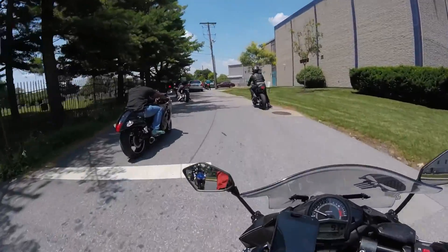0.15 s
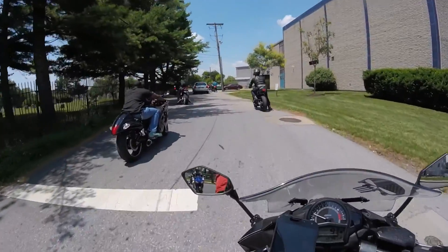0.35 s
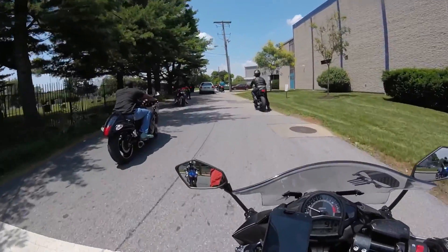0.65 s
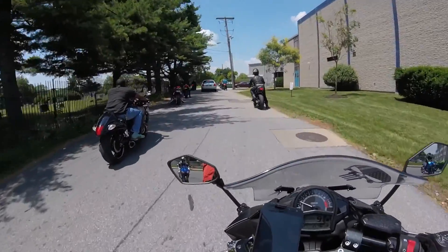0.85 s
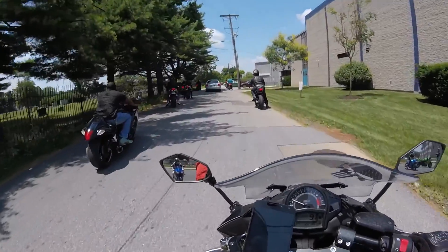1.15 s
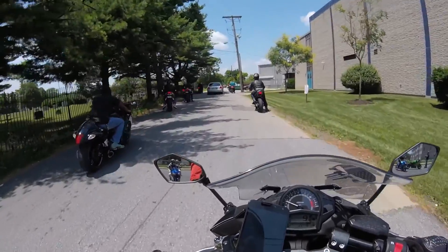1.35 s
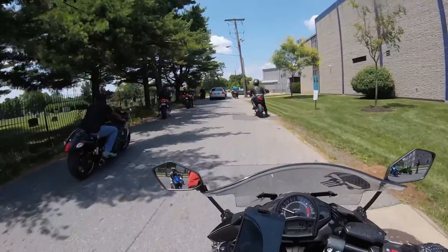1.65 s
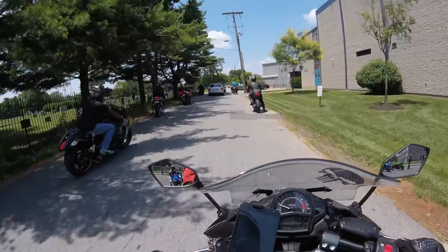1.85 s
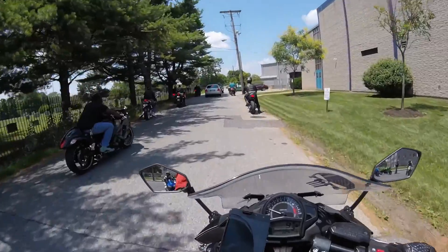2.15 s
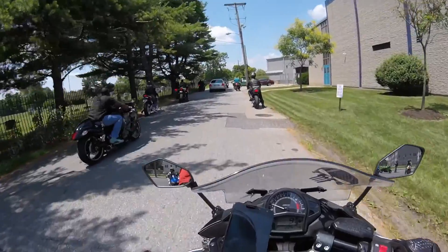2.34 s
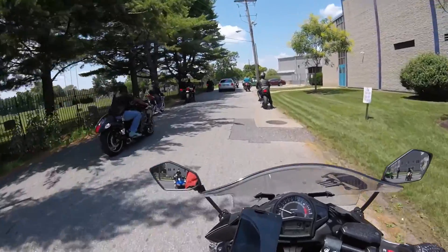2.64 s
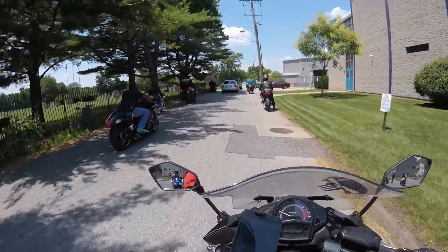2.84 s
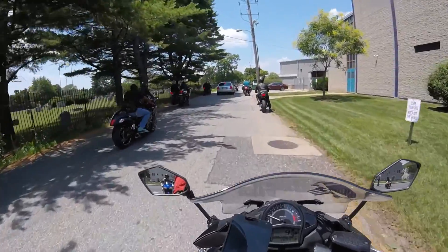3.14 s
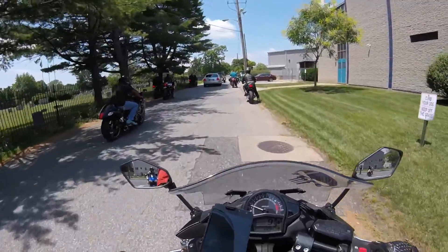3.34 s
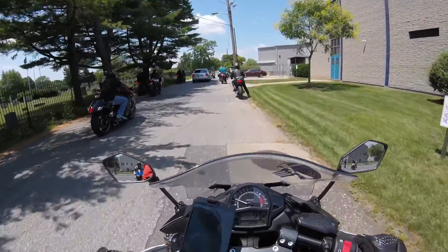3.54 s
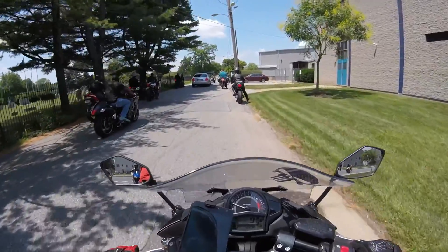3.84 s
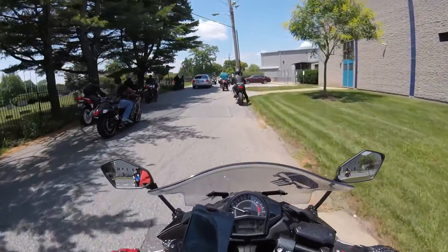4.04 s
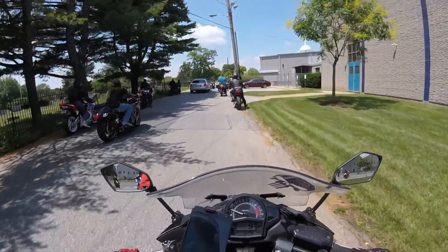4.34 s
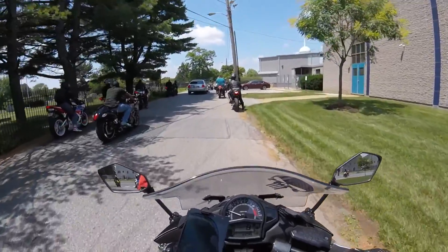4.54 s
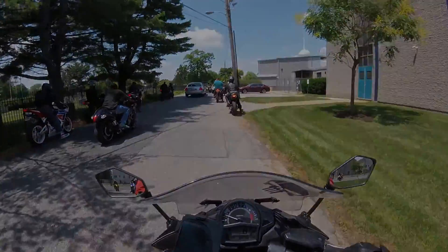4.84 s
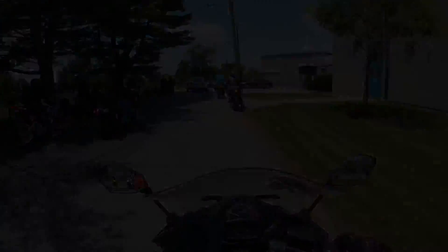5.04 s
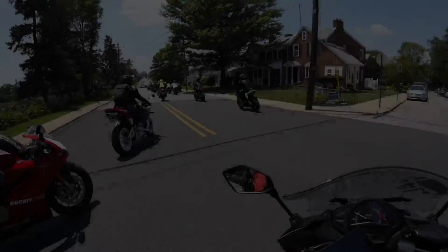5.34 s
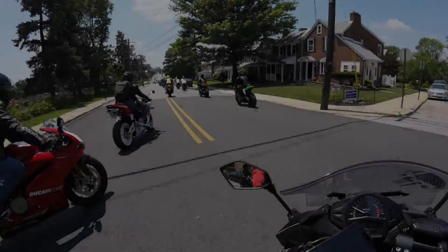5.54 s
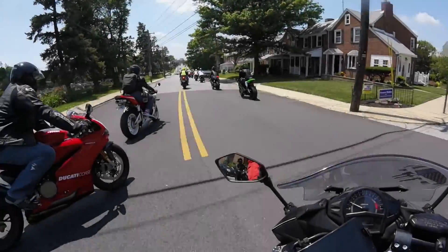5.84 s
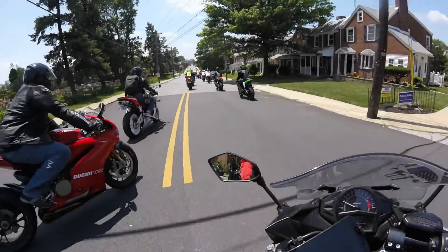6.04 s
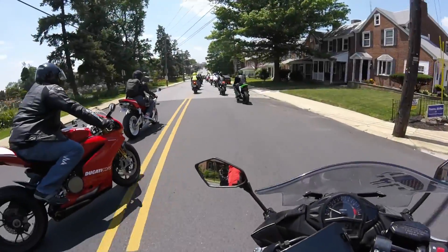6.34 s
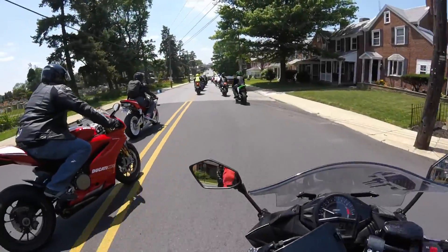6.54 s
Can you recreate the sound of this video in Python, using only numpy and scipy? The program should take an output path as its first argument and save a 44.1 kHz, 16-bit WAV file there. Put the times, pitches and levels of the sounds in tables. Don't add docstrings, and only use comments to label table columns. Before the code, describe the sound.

Muffled motorcycle pack thuds and rattles along a lane, one engine revs up and shuts off, hard knocks, then a cut to a brighter idling group.

```python
import sys
import numpy as np
from scipy import signal
from scipy.io import wavfile
from scipy.ndimage import uniform_filter1d

SR = 44100
rng = np.random.default_rng(int(sys.argv[2]) if len(sys.argv) > 2 else 0)


def master(y):
    cut = np.clip(np.atleast_2d(y).T, -1, 1)
    pcm = np.round(cut * 32767)
    wavfile.write(sys.argv[1], SR, pcm.astype(np.int16))


def convert_level_to_amplitude(level_db):
    exponent = np.asarray(level_db, float) / 20
    return 10 ** exponent


N = 295029
TIME = np.arange(N) / SR

CUT_S, DISSOLVE_S = 5.091, .012
EXHAUST_DB, NEAR_DB, BLUR_DB = (-30.5, -29), (-5.5, -10), -1
RECEDING_DB_PER_S, REV_MASK_DB = -0.2, 0.5
WIND_DB, CALMING_DB_PER_S = (-32, -33.5), -0.16
CLATTER_DB, BRIGHT_DB = (-43.5, -38), (-9.5, -9.5)
REV_CLATTER_DB, DULLING_DB_PER_S = 1, -.5
COAST_FROM_S, COAST_DB_PER_S = 3.8, -1
BUILD_DB_PER_S = 1
FRESH_TREBLE_DB, FRESH_S = 4.5, 0.6
SETTLE_DB, SETTLE_S = -2, 0.18
EARLY_RING_HZ, EARLY_RING_SHARE, EARLY_RING_S = 1540, 0.6, 0.25
PACK_SECOND_CYCLES, PACK_JITTER_CYCLES = .48, 0.022
THUD_CYCLES, THUD_DB = (2.87, 2.65), (-4, -0.5)
RATTLE_S, RATTLE_OVER_DB = 0.0059, (38, 34.5)
WHINE_HZ, WHINE_DB = 9650, -86
REV_BRIGHT_HZ, REV_BRIGHT_SHARE = 405, (-0.71, 0.61)
MIC_TOP_HZ = 13300

# start [t/s], end [t/s], cycle rate at start [f/Hz], at end [f/Hz], level [dB]
PACK_ENGINES = [
    (0, 7.4, 20, 13, -4.5),
    (0, 7.4, 25.4, 27.3, 5.5),
    (2.9, 5.1, 15.8, 23.8, 1.5),
    (3.45, 3.9, 20.5, 22.5, 2.5),
    (5.099, 5.95, 17.5, 14.6, -1.5),
]
# centre [f/Hz], width [f/Hz], level [dB]
LANE_PIPE_MODES = [(62, 16, -9.5), (86, 25, -4), (115, 39.6, -6), (205.6, 24.5, -1.5), (306, 89, -10),
                   (376, 52, -36)]
# centre [f/Hz], width [f/Hz], level [dB]
JUNCTION_PIPE_MODES = [(55.4, 7.1, -5.5), (110, 51, -3.5), (144.7, 25.5, 0), (205, 34, -3),
                       (334.5, 46, -13.5), (451, 26, -17)]
# centre [f/Hz], density in the lane [dB per Hz], at the junction [dB per Hz]
BLUR_SPECTRUM = [(49, -1, -4), (127, -0.5, -1.5), (167, -2, -17), (226, -6, -12), (284, -11, -18),
                 (308, -12.5, -11), (399, -18.5, -18.5), (575, -26, -30), (680, -46, -43), (995, -28, -27)]
# time [t/s], cycle rate [f/Hz], level [dB]
LEADER_COURSE = [
    (0, 19.5, -32.5),
    (.85, 21.1, -31.5),
    (1.3, 22, -44),
]
# centre [f/Hz], width [f/Hz], level [dB]
LEADER_PIPE_MODES = [(61, 12, 0), (84, 14, 1), (128, 22, -4), (207, 25, -3)]
# centre [t/s], length [t/s], level over the steady sway [dB]
GUSTS_S_DB = [
    (0.095, 0.53, 9.5),
    (2.542, 0.5, 1),
    (4.153, 0.31, 12.5),
    (5.237, 0.55, 10.5),
    (5.723, 0.4, 10),
    (6.432, .35, 10.5),
]
CASE_LOW_HZ = [770, 1095, 1250, 1525, 1750, 2260, 2650, 2900]
# width [f/Hz], level in the lane [dB], at the junction [dB]
CASE_LOW_MODES = [(270, -6, -5), (74, 6, 6), (112, 7, 6), (115, -1.5, 3), (276, -5, -2), (322, 2, 3.5),
                  (103, 0, -1.5), (276, -8, -7.5)]
CASE_HIGH_HZ = [3620, 3950, 4650, 5460, 6080, 6700, 7500, 8230, 9650, 10900, 12000]
# width [f/Hz], level in the lane [dB], at the junction [dB]
CASE_HIGH_MODES = [(360, 8, 0), (430, 1, -3.5), (500, -7.5, -4), (520, -8.5, -10), (500, -4, -7.5),
                   (604, -11.5, -13), (710, -13.5, -18.5), (610, -21.5, -20.5), (910, -20.5, -28),
                   (910, -25.5, -51), (900, -54.5, -32)]
# centre [f/Hz], width [f/Hz], depth in the lane [share]
CASE_NOTCHES = [(1930, 120, .5), (3230, 400, .4), (5090, 200, 0), (5870, 120, 0), (9170, 150, 0)]
# deepest dip [t/s], rate [f/Hz], level [dB], length [t/s]
HEAD_NODS = [
    (0, 30, -24, .03),
    (2.91, 22, -17, .12),
    (3.088, 18, -18, .1),
    (4.586, 10.5, -13, .26),
    (4.899, 15, -14, .17),
]
# time [t/s], peak level [dB], pitch [f/Hz]
LANE_THUD_EVENTS = [(0.0595, -21, 130), (0.134, -27, 134.4), (0.1594, -23, 161), (0.3368, -20, 118),
                    (0.4075, -22, 141), (0.469, -22, 126.3), (0.5355, -16, 153), (0.5647, -22, 149),
                    (0.6469, -18, 129), (0.6817, -16, 132), (0.7626, -31, 119.4), (0.791, -22, 126),
                    (0.844, -17, 142), (0.8951, -18, 173), (0.9379, -25, 112), (1.1456, -22, 115),
                    (1.2109, -15.5, 131), (1.2556, -21, 127), (1.3035, -22, 122), (1.335, -21, 169),
                    (1.4664, -26, 134), (1.5096, -19, 160), (1.5709, -18, 167), (1.6, -25, 147),
                    (1.623, -21, 138), (1.684, -16, 148), (1.762, -23, 185), (1.8056, -18, 145),
                    (1.8532, -18, 144), (1.893, -16, 168), (3.0209, -21.5, 183), (3.0701, -27, 130),
                    (3.1833, -17, 179), (3.3955, -30, 121), (3.4474, -17.5, 154), (3.5005, -19, 159.3),
                    (3.5769, -20, 138.5), (3.6195, -20, 141), (3.6477, -20.5, 138), (3.6787, -20, 117.2),
                    (3.7175, -14, 191.8), (3.7645, -21, 166), (3.8364, -22, 144), (3.909, -22, 141.4),
                    (3.9737, -25, 133), (4.0171, -17, 180), (4.0903, -15, 137), (4.1342, -20, 133.5),
                    (4.185, -23, 128), (4.2739, -35, 142.4), (4.3324, -19, 184.3), (4.3904, -24, 110),
                    (4.5054, -17, 142), (4.558, -23, 134), (4.6222, -21, 156), (4.66, -19, 137),
                    (4.9527, -22, 121), (5.0415, -16, 192)]
# time [t/s], peak level [dB], pitch [f/Hz]
JUNCTION_THUD_EVENTS = [(5.1085, -23, 103), (5.1521, -19, 135), (5.1963, -26, 114), (5.23, -26, 109),
                        (5.2571, -17.5, 110), (5.3037, -19, 108), (5.3313, -19.5, 123),
                        (5.3815, -20, 106.9), (5.4279, -20.5, 120), (5.458, -19, 112), (5.4873, -17, 122),
                        (5.5653, -15.5, 115), (5.6423, -15.5, 115), (5.7115, -20, 119.5),
                        (5.7714, -16, 111), (5.8043, -30, 124), (5.8277, -25, 114), (5.8594, -20.5, 128),
                        (5.8963, -19, 121), (5.9358, -18, 119), (5.9919, -19, 117), (6.0356, -23, 118),
                        (6.1026, -22, 123), (6.133, -19, 128), (6.1773, -18, 117.2), (6.2075, -20, 111),
                        (6.2863, -15, 135), (6.3288, -21.5, 113), (6.3566, -18.5, 106), (6.428, -26, 116),
                        (6.473, -20, 107), (6.5005, -16, 105), (6.539, -20, 114), (6.579, -26, 114),
                        (6.6213, -15.5, 112), (6.648, -15.5, 105)]
# time [t/s], peak level [dB]
LANE_RATTLE_EVENTS = [(0.247, -37.5), (0.314, -33.5), (0.503, -37), (0.63, -44), (0.821, -34), (0.9, -35.0),
                      (1.015, -34.5), (1.097, -34), (1.146, -33), (1.228, -35.5), (1.278, -34.5),
                      (1.338, -34.5), (1.609, -36), (1.657, -36), (1.743, -34), (1.88, -34), (1.965, -33),
                      (2.033, -34), (2.159, -34.5), (2.211, -34.5), (2.279, -33), (2.343, -36),
                      (2.408, -34), (2.477, -36.0), (2.561, -37), (2.69, -37.0), (2.74, -36.0),
                      (2.824, -37), (3.011, -37), (3.061, -35), (3.274, -34), (3.346, -34), (3.403, -38),
                      (3.434, -36.0), (3.468, -36), (3.499, -34), (3.533, -36), (3.597, -37), (3.689, -38),
                      (3.727, -34.5), (3.755, -38), (3.79, -36), (3.816, -34), (3.885, -37.5), (3.969, -33),
                      (4.036, -36.0), (4.156, -33), (4.391, -33), (4.487, -36), (4.513, -35), (4.559, -33),
                      (4.626, -33.5), (4.7, -34), (4.789, -33.5), (4.837, -35), (4.877, -34)]
# time [t/s], peak level [dB]
JUNCTION_RATTLE_EVENTS = [(5.139, -28.5), (5.241, -29.5), (5.471, -29.5), (5.505, -29), (5.57, -31.0),
                          (5.631, -30.5), (5.755, -30.5), (5.785, -30), (5.812, -33.5), (5.906, -31.5),
                          (5.951, -31.5), (5.993, -30.5), (6.021, -28), (6.05, -30.5), (6.082, -34.5),
                          (6.187, -34), (6.234, -31.5), (6.324, -30.0), (6.359, -31.5), (6.397, -34),
                          (6.445, -34.5), (6.508, -30), (6.535, -31), (6.65, -32.0)]
# time [t/s], peak level [dB], pitch [f/Hz]
TICK_EVENTS = [
    (.501, -29.5, 1200),
    (.6272, -28, 1220),
    (3.0083, -27, 2250),
]
# time [t/s], firing rate [f/Hz], level [dB]
REV_COURSE = [
    (1.2, 32, -42),
    (1.5, 36.76, -39),
    (1.761, 38.01, -37.5),
    (2.1, 43.46, -31),
    (2.59, 50.03, -32.5),
    (2.8, 50.42, -32),
    (2.899, 47.5, -39),
    (3.04, 43.4, -50),
]
# centre [f/Hz], width [f/Hz], level [dB]
REV_PIPE_MODES = [(46.8, 24, 4.5), (84, 25, -4.5), (160, 30, 0), (226, 28, 4), (290, 57, -2.5),
                  (343, 39, -7), (405, 43, -16.5)]
# time [t/s], direction [sign], push level [dB], push length [t/ms], swing level [dB]
KNOCK_EVENTS = [
    (2.867, -1, -4, 7.5, -10),
    (2.884, -1, -18, 10, -17),
    (3.067, -1, -17, 9, -20),
    (4.452, -1, -1.5, 6.5, -10.5),
    (4.4695, -1, -11, 10, -20),
    (4.478, 1, -9, 10, -30),
    (4.463, 1, -14, 6, -40),
    (4.9008, -1, -2.5, 5.6, -9),
    (4.9035, -1, -15, 6, -40),
    (4.912, 1, -14, 8, -40),
]
# rate [f/Hz], level [dB], t60 [t/s]
MOUNT_MODES = [(22, -5, .22), (63, 0, .14), (130, -5, .1)]
# time [t/s], pitch [f/Hz], peak level [dB], half length [t/s]
BRAKE_SQUEAK = (5.278, 15044, -61, .011)
# pitch [f/Hz], patches dropped [share]
TREBLE_HOLES = [(7500, 0), (9000, .2), (11000, .35), (12200, .55), (13300, .85)]


def unit(x):
    return x / np.sqrt(np.mean(x ** 2))


def ring(x, hz, width_hz):
    return signal.lfilter(*signal.iirpeak(hz, hz / width_hz, fs=SR), x)


def double_ring(x, hz, width_hz):
    return ring(ring(x, hz, width_hz), hz, width_hz)


def bump(turns):
    return np.cos(np.pi * np.clip(turns, -.5, .5)) ** 2


def walk(rate_hz):
    k = int(SR / rate_hz)
    held = np.repeat(rng.standard_normal(N // k + 1), k)
    return 0.92 * uniform_filter1d(uniform_filter1d(held, k), k)[:N]


def flutter(rate_hz):
    steps = walk(rate_hz)
    return steps - uniform_filter1d(steps, size=SR // 9)


def by_street(lane, junction):
    share = np.clip((TIME - CUT_S) / DISSOLVE_S, 0, 1)
    return (1 - share) * lane + share * junction


def firings(cycle_hz, second_cycles, weak_db, jitter_cycles, scatter_db):
    turns = np.cumsum(cycle_hz) / SR
    cycles = np.arange(int(turns[-1]))
    chance = rng.standard_normal((len(cycles), 4))
    first = cycles + jitter_cycles * chance[:, 0]
    second = cycles + second_cycles + jitter_cycles * chance[:, 1]
    level_db = np.concatenate([scatter_db * chance[:, 2], weak_db + scatter_db * chance[:, 3]])
    index = np.searchsorted(turns, np.concatenate([first, second])).clip(0, N - 1)
    clicks = np.zeros(N)
    np.add.at(clicks, index, convert_level_to_amplitude(level_db))
    return clicks


def pipe(clicks, modes):
    tone = 0
    for k, (hz, width_hz, db) in enumerate(modes):
        tone = tone + (-1) ** k * convert_level_to_amplitude(db) * double_ring(clicks, hz, 1.5 * width_hz)
    return unit(tone)


def pack():
    clicks = np.zeros(N)
    for start, end, hz0, hz1, db in PACK_ENGINES:
        drift = 1 + PACK_JITTER_CYCLES * walk(3)
        cycle_hz = np.interp(TIME, [start, end], [hz0, hz1]) * drift
        near = np.interp(TIME, [start - .1, start, end, end + 0.062], [0, 1, 1, 0])
        fired = firings(cycle_hz, PACK_SECOND_CYCLES, 0.0, PACK_JITTER_CYCLES, scatter_db=1.0)
        clicks += convert_level_to_amplitude(db) * near * fired
    return clicks


def blur():
    hz, *streets_db = np.transpose(BLUR_SPECTRUM)
    bands = 0
    for centre_hz in 60 * 2 ** np.arange(0, 4.1, 1 / 3):
        noise = double_ring(rng.standard_normal(N), centre_hz, centre_hz / 3)
        lane_db, junction_db = (np.interp(np.log(centre_hz), np.log(hz), db) for db in streets_db)
        bands = bands + noise * convert_level_to_amplitude(by_street(lane_db, junction_db) + 0.59 * walk(6.6))
    return unit(bands)


def exhausts(clicks, revs):
    lane = convert_level_to_amplitude(NEAR_DB[0]) * pipe(clicks * by_street(1, 0), LANE_PIPE_MODES)
    junction = convert_level_to_amplitude(NEAR_DB[1]) * pipe(clicks * by_street(0, 1), JUNCTION_PIPE_MODES)
    lane_db = EXHAUST_DB[0] + RECEDING_DB_PER_S * TIME + REV_MASK_DB * revs
    return convert_level_to_amplitude(by_street(lane_db, EXHAUST_DB[1])) * (lane + junction + convert_level_to_amplitude(BLUR_DB) * blur())


def leader():
    s, hz, db = np.transpose(LEADER_COURSE)
    clicks = firings(np.interp(TIME, s, hz), .27, weak_db=-1, jitter_cycles=.004, scatter_db=1)
    fade = np.interp(TIME, [s[-1], s[-1] + .2], [1, 0])
    return pipe(clicks, LEADER_PIPE_MODES) * convert_level_to_amplitude(np.interp(TIME, s, db)) * fade


def buffet():
    band = signal.butter(2, [30, 65], "band", fs=SR, output="sos")
    low = signal.sosfilt(band, rng.standard_normal(N))
    sway = double_ring(rng.standard_normal(N), 11.5, 8.)
    gust_db = sum(db * bump((TIME - s) / length_s) for s, length_s, db in GUSTS_S_DB)
    shake = unit(low * convert_level_to_amplitude(1.6 * walk(6.6))) * convert_level_to_amplitude(0.2 * gust_db)
    level_db = by_street(WIND_DB[0] + CALMING_DB_PER_S * TIME, WIND_DB[1])
    return convert_level_to_amplitude(level_db) * (shake + convert_level_to_amplitude(-2.5 + gust_db) * unit(sway))


def clatter_levels_db(revs):
    since_cut = np.clip(TIME - CUT_S, 0, None)
    coasting_s = np.clip(TIME - COAST_FROM_S, 0, None)
    lane_db = CLATTER_DB[0] + REV_CLATTER_DB * revs + COAST_DB_PER_S * coasting_s
    junction_db = CLATTER_DB[1] + BUILD_DB_PER_S * since_cut + SETTLE_DB * np.exp(-since_cut / SETTLE_S)
    gap_db = 8 * np.exp(-((TIME - CUT_S) / .006) ** 2)
    bright_db = by_street(BRIGHT_DB[0] + DULLING_DB_PER_S * TIME,
                          BRIGHT_DB[1] + FRESH_TREBLE_DB * np.exp(-since_cut / FRESH_S))
    return by_street(lane_db, junction_db) - gap_db, bright_db


def case_band(centres_hz, modes, pulsing, flicker_db):
    ticks = convert_level_to_amplitude(rng.exponential(size=N // 64 + 1)).repeat(64)[:N]
    shake_db = flicker_db * flutter(36)
    lane, junction = 0, 0
    for hz, (width_hz, lane_db, junction_db) in zip(centres_hz, modes):
        drive = rng.standard_normal(N) * ticks * pulsing
        tone = ring(ring(drive, hz, width_hz), hz, 3.0 * width_hz)
        tone = tone * convert_level_to_amplitude(2.1 * flutter(36) + .9 * walk(9) + shake_db)
        lane = lane + convert_level_to_amplitude(lane_db) * tone
        junction = junction + convert_level_to_amplitude(junction_db) * tone
    return by_street(unit(lane), unit(junction))


def clatter(clicks, revs):
    clatter_db, bright_db = clatter_levels_db(revs)
    lift_db = rattles_db()
    puffs = unit(signal.lfilter([1], [1, -np.exp(-1 / (0.0038 * SR))], clicks))
    pulsing = np.abs((1 + 0.094 * puffs) * convert_level_to_amplitude(0.12 * walk(9.7) + 0.55 * walk(35)))
    low = case_band(CASE_LOW_HZ, CASE_LOW_MODES, pulsing, flicker_db=.7)
    high = case_band(CASE_HIGH_HZ, CASE_HIGH_MODES, pulsing ** .4, flicker_db=.4)
    sound = low * convert_level_to_amplitude(clatter_db + lift_db) + high * convert_level_to_amplitude(clatter_db + bright_db + .2 * lift_db)
    settling = by_street(0, EARLY_RING_SHARE * np.exp(-np.abs(TIME - CUT_S) / EARLY_RING_S))
    sound = sound + settling * ring(sound, EARLY_RING_HZ, 110.0)
    for hz, width_hz, lane_depth in CASE_NOTCHES:
        sound = sound - by_street(lane_depth, .5) * ring(sound, hz, width_hz)
    return sound


def nods():
    out = 0
    for s, hz, db, length_s in HEAD_NODS:
        out = out - convert_level_to_amplitude(db) * np.cos(2 * np.pi * hz * (TIME - s)) * bump((TIME - s) / length_s)
    return out


def whine():
    tone = np.sin(2 * np.pi * WHINE_HZ * TIME)
    return convert_level_to_amplitude(WHINE_DB + 3.4 * walk(6)) * tone * by_street(0.93, 0)


def thuds():
    out = np.zeros(N + SR)
    t = np.arange(-800, 800) / SR
    for events, cycles, gain_db in zip((LANE_THUD_EVENTS, JUNCTION_THUD_EVENTS), THUD_CYCLES, THUD_DB):
        for s, db, hz in events:
            start = int(s * SR) - 800
            slap = np.cos(2 * np.pi * hz * t) * bump(hz * t / cycles)
            out[start:start + len(t)] += convert_level_to_amplitude(db + gain_db) * slap
    return out[:N]


def rattles_db():
    lifts_db = np.zeros(N)
    for events, over_db in zip((LANE_RATTLE_EVENTS, JUNCTION_RATTLE_EVENTS), RATTLE_OVER_DB):
        for s, db in events:
            lifts_db[int(s * SR)] = db + over_db
    t = np.arange(-900, 901) / SR
    return signal.oaconvolve(lifts_db, np.exp(-(t / RATTLE_S) ** 2), "same")


def metal_ticks():
    out = np.zeros(N)
    for s, db, hz in TICK_EVENTS:
        t = np.clip(TIME - s, 0, 1) / .0012
        out += convert_level_to_amplitude(db) * np.sin(2 * np.pi * hz * (TIME - s)) * t * np.exp(1 - t)
    return out


def rev_share():
    s, hz, _ = np.transpose(REV_COURSE)
    return np.interp(TIME, s, (hz - hz.min()) / np.ptp(hz), left=0, right=0)


def revving_twin():
    s, hz, db = np.transpose(REV_COURSE)
    cycle_hz = np.interp(TIME, s, hz) / 2
    clicks = firings(cycle_hz, .5, weak_db=-5, jitter_cycles=.004, scatter_db=1.5)
    sounding = np.interp(TIME, [s[0] - .2, s[0], s[-1], s[-1] + 0.038], [0, 1, 1, 0])
    tone = pipe(clicks, REV_PIPE_MODES)
    opening = np.interp(TIME, [2.15, 2.65], REV_BRIGHT_SHARE)
    tone = tone + opening * ring(tone, REV_BRIGHT_HZ, 71.0)
    return tone * convert_level_to_amplitude(np.interp(TIME, s, db) + 4) * sounding


def knocks():
    out = np.zeros(N)
    t = np.arange(-SR // 100, SR // 2) / SR
    swing = 0
    for hz, db, t60_s in MOUNT_MODES:
        decay = np.exp(-np.log(1000) * t / t60_s)
        swing = swing + convert_level_to_amplitude(db) * np.cos(2 * np.pi * hz * (t - .0012)) * decay
    swing = swing * (1 - np.exp(-np.clip(t, 0, 1) / .0045)) ** 2
    for s, direction, push_db, push_ms, swing_db in KNOCK_EVENTS:
        push = bump(1000 * t / push_ms)
        start = int(s * SR) - SR // 100
        out[start:start + len(t)] += direction * (convert_level_to_amplitude(push_db) * push + convert_level_to_amplitude(swing_db) * swing)
    return signal.sosfiltfilt(signal.butter(2, 500, fs=SR, output="sos"), out)


def brake_squeak():
    s, hz, db, half_s = BRAKE_SQUEAK
    return convert_level_to_amplitude(db) * np.sin(2 * np.pi * hz * TIME) * np.exp(-((TIME - s) / half_s) ** 2)


def scene():
    revs = rev_share()
    clicks = pack()
    engines = exhausts(clicks, revs) + leader() - revving_twin()
    shaking = buffet() + nods() + thuds() + knocks()
    metal = clatter(clicks, revs) + whine() + metal_ticks()
    return (engines + shaking + metal)[None]


def drop_patches(x):
    hz, _, cells = signal.stft(x, SR, nperseg=1024)
    share = np.interp(hz, *np.transpose(TREBLE_HOLES))[:, None]
    frames = cells.shape[-1]
    chance = rng.random((86, frames // 2 + 1)).repeat(6, axis=0).repeat(2, axis=1)
    kept = chance[:len(hz), :frames] > share
    return signal.istft(cells * kept / np.sqrt(1 - share), SR, nperseg=1024)[1][..., :N]


def roll_off(x):
    return signal.sosfilt(signal.butter(12, 15400, fs=SR, output="sos"), x)


def record(dry):
    rounded = dry / (1 + np.abs(dry) ** 16) ** (1 / 16)
    dull = signal.sosfilt(signal.ellip(8, .2, 60, MIC_TOP_HZ, fs=SR, output="sos"), rounded)
    mix = drop_patches(dull) + brake_squeak()
    return roll_off(mix)


dry = scene()
out = record(dry)
master(out)
```